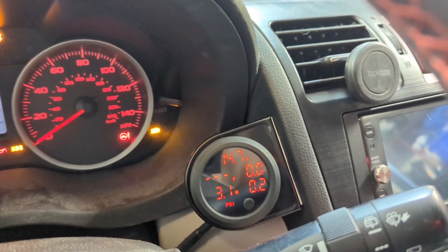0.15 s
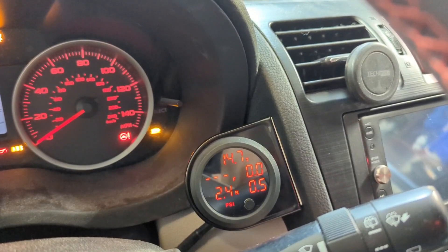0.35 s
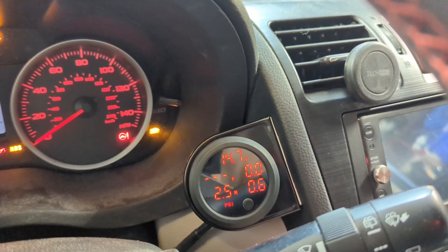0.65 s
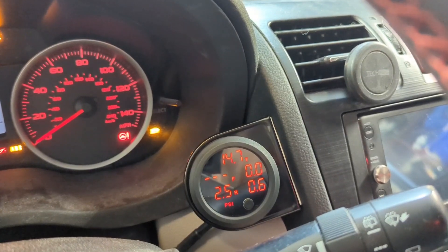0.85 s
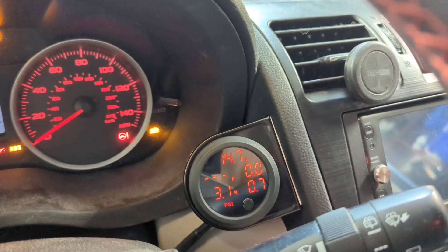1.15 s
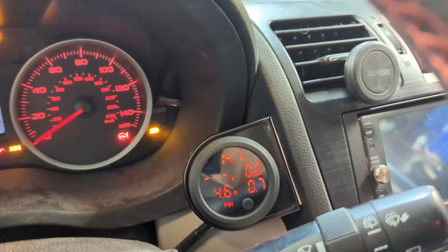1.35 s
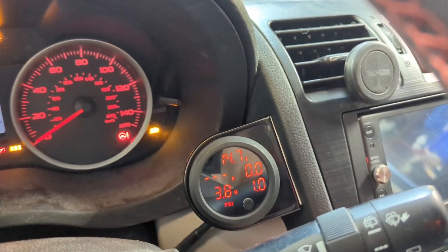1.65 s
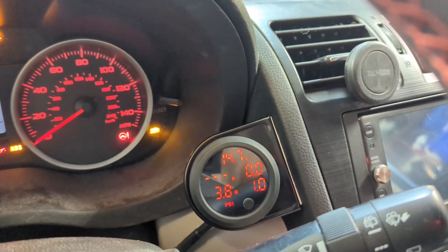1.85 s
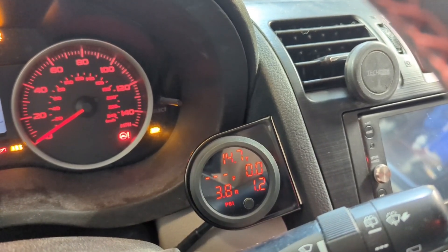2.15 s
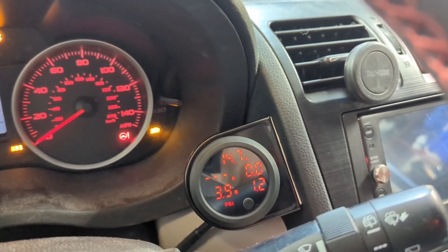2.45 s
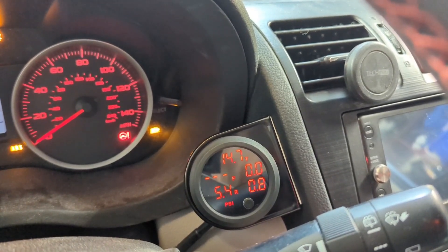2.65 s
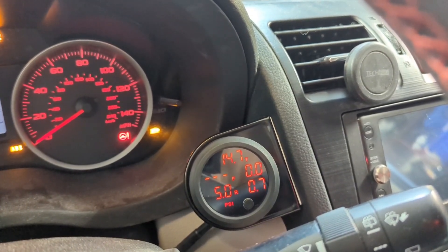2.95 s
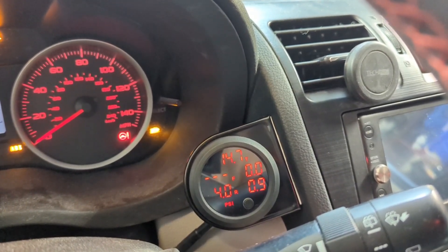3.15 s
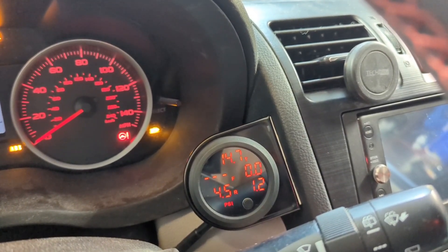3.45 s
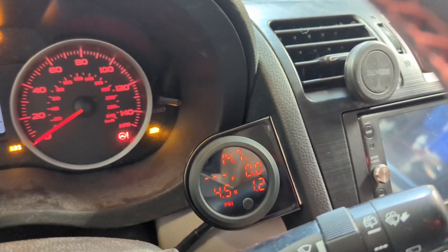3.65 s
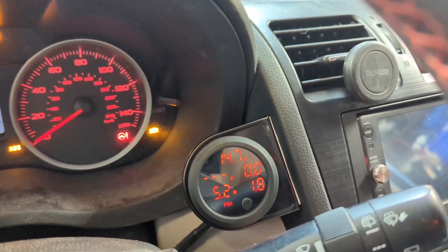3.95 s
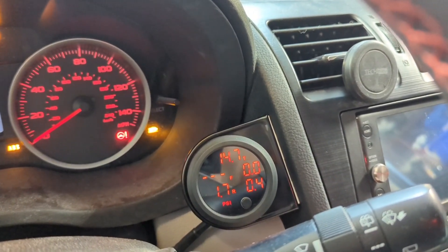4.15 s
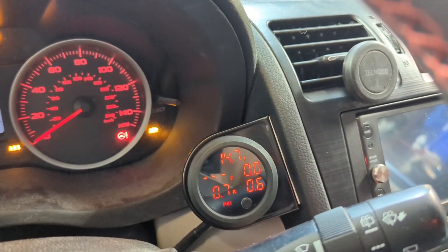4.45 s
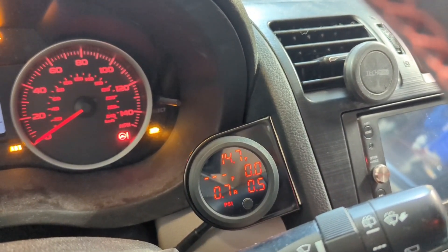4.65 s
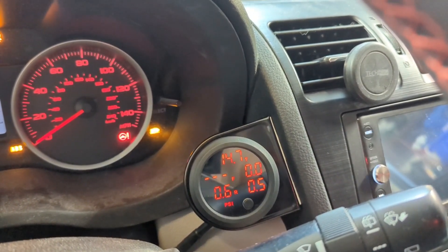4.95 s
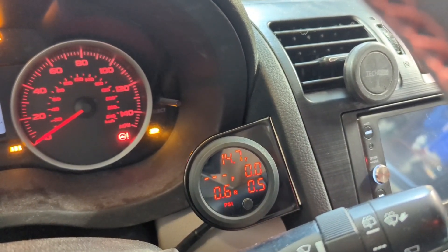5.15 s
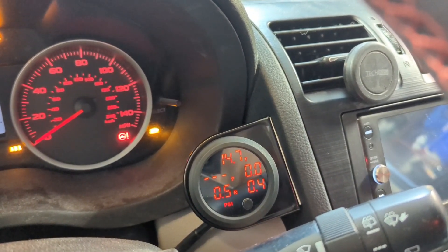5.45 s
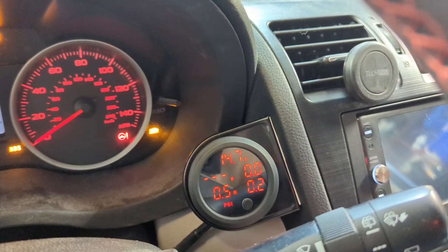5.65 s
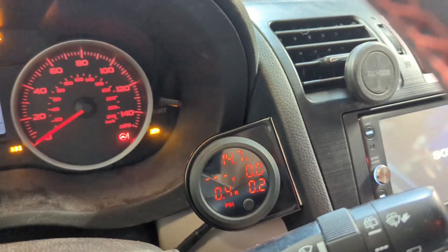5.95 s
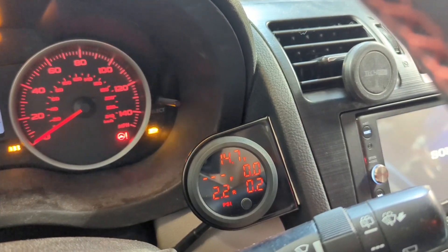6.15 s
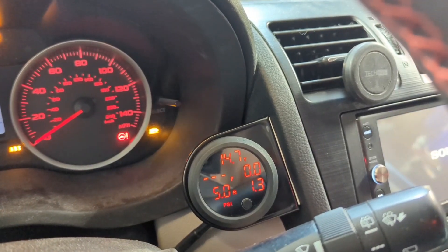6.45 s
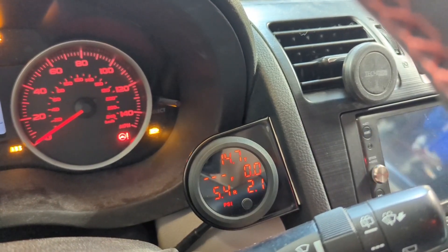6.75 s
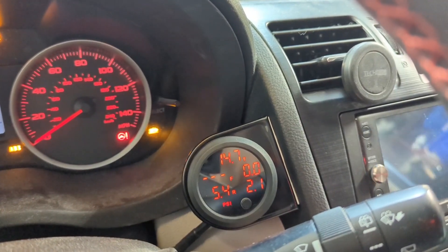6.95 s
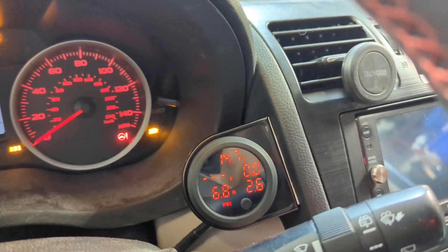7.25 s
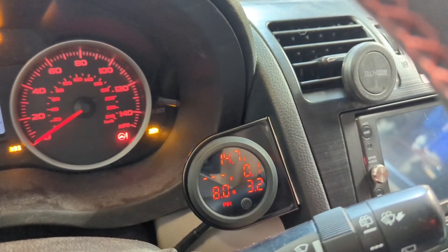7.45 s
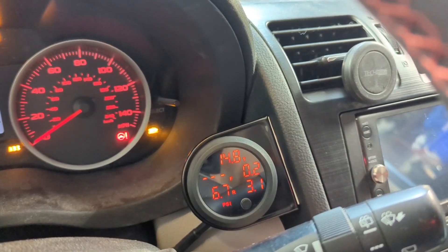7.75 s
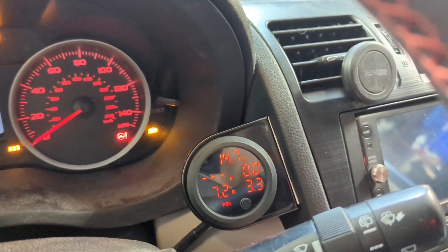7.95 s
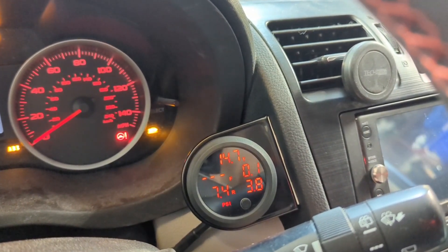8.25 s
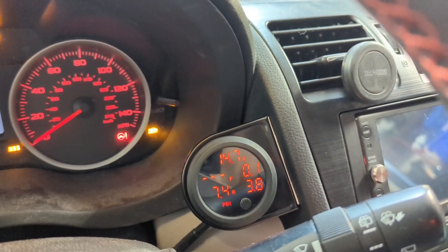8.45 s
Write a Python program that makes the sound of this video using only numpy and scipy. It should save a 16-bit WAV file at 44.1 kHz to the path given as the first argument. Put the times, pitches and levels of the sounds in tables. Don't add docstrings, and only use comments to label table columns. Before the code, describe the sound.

From the driver's seat, a starter motor turns an engine that will not fire, pulsing about six times a second with gear knock, hiss and thin whistle. The key is released with sharp clicks, a low thump and a whine sliding down. After near silence with faint hum, a solenoid clunks, the body shudders and cranking resumes to the end.

```python
import sys
import numpy as np
from scipy import signal
from scipy.fft import rfft, irfft
from scipy.io import wavfile
from scipy.ndimage import uniform_filter1d

SR = 44100
rng = np.random.default_rng(int(sys.argv[2]) if len(sys.argv) > 2 else 0)


def decibels_to_gain(level_db):
    exponent = np.asarray(level_db, float) / 20
    return 10 ** exponent


def unload_audio(sound):
    columns = np.transpose(np.atleast_2d(sound))
    steps = np.round(np.clip(columns, -1, 1) * 32767)
    wavfile.write(sys.argv[1], SR, steps.astype(np.int16))


N = 378819
TIME, HZ = np.arange(N) / SR, np.fft.rfftfreq(N, 1 / SR)

# (time [s], whine [Hz], whir level [dB])
COAST = [
    (3.68, 7900, -51),
    (3.76, 7500, -40),
    (3.9, 6800, -39),
    (4.1, 5050, -40.5),
    (4.35, 3300, -44),
    (4.5, 2350, -45),
    (4.65, 1400, -52.5),
    (4.75, 900, -60),
    (4.82, 600, -86),
]
# (frequency [Hz], density [dB per Hz])
WHIR = [(53, -28), (90, 3), (117, -25), (161, 1), (328, -19), (495, -8), (830, -8.5), (2050, -6),
        (3370, -17), (7020, -7), (8900, -6), (11000, -10.5), (12600, -6), (15600, -18)]


def evened(x):
    return x / np.sqrt(np.mean(x ** 2) + 1e-20)


def over_hz(points, column=1):
    table = np.transpose(points)
    return np.interp(np.log(HZ + 1), np.log(table[0] + 1), table[column])


def over_time(rows, column=1):
    table = np.transpose(rows)
    return np.interp(TIME, table[0], table[column])


def coloured(x, colour_db):
    return evened(irfft(rfft(x) * decibels_to_gain(colour_db), N))


def resonate(x, hz, width):
    turn = np.exp(2j * np.pi * np.cumsum(hz) / SR)
    r = np.exp(-np.pi * width / SR)
    smoothed = signal.lfilter([1], np.convolve([1, -r], [1, -r]), x / turn)
    return evened((turn * smoothed).real)


def swelling(s, db, rise, fall):
    distance = np.where(TIME < s, (s - TIME) / rise, (TIME - s) / fall)
    return decibels_to_gain(db - 20 * distance)


def add(mix, s, sound):
    at = round(s * SR)
    sound = sound[:, max(-at, 0):]
    part = mix[:, max(at, 0):][:, :sound.shape[1]]
    part += sound[:, :part.shape[1]]


def strokes():
    # (time [s], battery strength [dB])
    rounds = [(-0.012, 0), (0.67, -.6), (1.345, 0), (2.02, 0), (2.697, -.6), (3.375, .6), (4.052, 0),
              (5.76, -4), (6.499, -1.5), (7.199, .3), (7.881, 0), (8.569, -1.5), (9.25, 0)]
    firing = [0, .249, .503, .755]
    pause_start_s, pause_end_s = 3.6, 6.3
    s, db = np.transpose(rounds)
    times = s[:-1, None] + np.diff(s)[:, None] * firing
    rows = []
    for (k, cylinder), at in np.ndenumerate(times):
        cranking = at < pause_start_s or at > pause_end_s
        if cranking and at < N / SR:
            rows.append((at, db[k], cylinder))
    return rows


def drive_db():
    # (time [s], level [dB])
    let_go = [
        (3.66, 0),
        (3.72, 1.5),
        (3.76, -5.5),
        (3.8, -10.5),
        (3.9, -62),
    ]
    # (time [s], level [dB])
    bite = [
        (5.9, -64),
        (5.915, -32),
        (5.952, -18),
        (5.96, -10),
        (6.02, -2.5),
        (6.25, -2.5),
        (6.31, .6),
        (6.5, 0),
    ]
    return over_time(let_go + bite)


def gear_tones():
    # (thud [dB], boom [dB], mesh [dB], double mesh [dB], housing [dB])
    cylinders = [(-43, -39.5, -43.5, -39, -38), (-44.5, -38.8, -36.5, -41.5, -38),
                 (-40.8, -38.5, -40.5, -41.5, -39), (-39.8, -38.5, -39, -40.5, -40)]
    # (place [0-1], length [0-1], frequency [Hz], glide [share
    # per stroke], level [dB])
    thud = [(.24, .065, 76, .085, 5), (.45, .055, 72, -.022, 4.5), (.65, .055, 68, -.043, 4),
            (.18, .23, 52, 0, -5)]
    boom = [(.1, .085, 206, -.8, 5), (.34, .04, 200, 0, -12), (.81, .24, 180, 0, -7.5),
            (.13, .06, 140, -1.6, -3), (.36, .04, 135, -.019, -4.5)]
    mesh = [(.25, .075, 315, -.5, 4), (.55, .01, 295, .3, -12)]
    double_mesh = [(.05, .045, 660, -.23, 6.8), (.27, .08, 622, 0, 1.5), (.40, .06, 655, .1, -2.5),
                   (.45, .12, 905, -.1, -6), (.02, .05, 425, -.3, -2), (.1, .08, 490, 0, -5)]
    housing = [(.44, .06, 1550, -.1, 1.5), (.1, .1, 1810, -.23, -6), (.36, .11, 2110, 0, -10),
               (.2, .02, 1500, -.1, -3.5),
               (.24, .08, 1642, 0, 5.5), (.33, .1, 1310, -.03, 3.5)]
    stroke_s, lead_in, uneven_db = .17, .2, 1.3
    parts = (thud, boom, mesh, double_mesh, housing)
    tones = [(part, *tone) for part, table in enumerate(parts) for tone in table]
    place = np.arange(-lead_in, 1.2, 1 / (stroke_s * SR))
    out, rows = np.zeros((2, N)), strokes()
    chance = rng.standard_normal((len(rows), len(tones), 5))
    for (s, battery_db, cylinder), luck in zip(rows, chance):
        stroke = np.zeros((2, len(place)))
        for (part, centre, length, hz, glide, db), (detune, late, size, start, skew) in zip(tones, luck):
            u = place - centre - .01 * late
            pitch = 1 + .006 * detune
            turns = np.cumsum(hz * (pitch + glide * u)) / SR
            spread = length * np.where(u < 0, .75, 1.25)
            strength_db = cylinders[cylinder][part] + battery_db + db + uneven_db * size
            lag = np.array([[0], [.25 + .06 * skew]])
            swell = decibels_to_gain(strength_db - 3.5) * np.exp(-(u / spread) ** 2 / 2)
            stroke += np.sqrt(2) * swell * np.cos(2 * np.pi * (turns + start + lag))
        add(out, s - lead_in * stroke_s, stroke)
    return out


def gear_noise():
    # (place in the stroke [0-1], load [dB])
    stroke_load = [(0, -4.5), (.07, -2.5), (.25, 1.2), (.5, -.3), (.7, -4.5), (.93, -11.5), (1, -5.5)]
    # (frequency [Hz], density [dB per Hz])
    brushes = [(24, -32), (40, 5), (71, -3.5), (129, -9.5), (208, -6), (510, -16.5), (639, -4.5),
               (780, -12), (862, -6), (1650, -1), (2250, -2.5), (3000, -9), (5610, -14.3), (7380, -9),
               (11000, -19), (12500, -13.5), (15600, -20)]
    # (frequency [Hz], density [dB per Hz])
    tooth_knock = [(24, -33), (40, 5), (71, -4.5), (133, -9), (203, -4.5), (260, -33), (310, 3), (369, -17),
                   (639, -3), (780, -18), (884, -7.5), (1650, -2), (2250, -9), (3000, -4), (5610, -10.5),
                   (7380, -9), (15600, -27)]
    # (frequency [Hz], width [Hz], level [dB])
    resonances = [(221.4, 18, 6), (705, 50, -3.5), (644, 24, 4), (872, 15, 6), (750, 25, 2.5),
                  (1264, 46, 1.5), (1570, 50, 2.5), (1623, 11, 3.5), (1736, 15, -1.5), (1820, 32, 2.5),
                  (2017, 27, 2), (990, 90, -1.5), (2404, 41, 3.5), (3085, 25, 3), (3220, 9.2, 8.5),
                  (4100, 40, 4), (7520, 220, 2.5), (8860, 220, 4.5), (12100, 840, 2.5)]
    running_db, loaded_db, flicker_db = -31.2, -32.8, 0.75
    teeth_hz, teeth_depth = 309.1, 0.3

    starts = np.sort(np.r_[np.transpose(strokes())[0], 3.71, 5.95])
    place = np.interp(TIME, starts, np.arange(len(starts))) % 1
    load_db = np.interp(place, *np.transpose(stroke_load))
    cabin_db = sum(db / (1 + (2 * (HZ - hz) / width) ** 2) for hz, width, db in resonances)
    hiss, knock, jitter = rng.standard_normal((3, 2, N))
    flicker = decibels_to_gain(flicker_db * evened(uniform_filter1d(jitter[0], 500)))

    running = decibels_to_gain(running_db) * coloured(hiss * flicker, over_hz(brushes) + cabin_db)
    body = irfft(rfft(running) / (1 + (HZ / 1400) ** 4) / (1 + (250 / (HZ + 1)) ** 6), N)
    running = running + body * (decibels_to_gain(.6 * load_db + 2.5) - 1)

    wander = 3.0 * uniform_filter1d(jitter[1], 300)
    teeth = np.cumsum(teeth_hz * (1 + .15 * np.cos(2 * np.pi * place) + wander)) / SR
    chop = 1 - teeth_depth + teeth_depth * 4 * np.exp(-4 * (teeth % 1))
    knock = coloured(knock * chop * flicker, over_hz(tooth_knock) + cabin_db)
    chug = irfft(rfft(knock) / (1 + (HZ / 1300) ** 4), N)
    loaded = decibels_to_gain(loaded_db) * (decibels_to_gain(1.3 * load_db + 2.5) * chug + decibels_to_gain(load_db) * (knock - chug))
    return (running + loaded) * decibels_to_gain(drive_db())


def coil_whistle():
    whistle_hz, width_hz, whistle_db = 7168, 30, -54.5
    level_db = np.maximum(drive_db(), over_time(COAST, column=2) + 36)
    seeds = rng.standard_normal((2, N))
    whistle = np.array([resonate(n, np.full(N, whistle_hz), width_hz) for n in seeds])
    return decibels_to_gain(whistle_db + level_db) * whistle


def cabin_echo(pair):
    echo_db, t60_s = -11, 0.073
    t = np.arange(6000) / SR
    tail = rng.standard_normal((2, len(t))) * decibels_to_gain(-60 * t / t60_s) * (t > .002)
    tail = decibels_to_gain(echo_db) * tail / np.linalg.norm(tail, axis=1)[:, None]
    echo = signal.oaconvolve(pair, tail, axes=1)[:, :N]
    return pair + irfft(rfft(echo) / (1 + (1400 / (HZ + 1)) ** 4), N)


def garage():
    # (frequency [Hz], density [dB per Hz])
    room = [(18, -45.5), (30, -21), (43, -2), (169, -4), (231, -11), (351, -5), (380, -11.5), (433, -8),
            (577, -14.5), (641, -6.5), (730, -14.5), (855, -9.5), (1140, -16.5), (1520, -16), (15600, -56)]
    # (time [s], level [dB])
    after = [
        (4.6, -90),
        (4.72, -57),
        (5.0, -74),
        (5.3, -68),
        (5.36, -90),
    ]
    room_db = -50
    hum, hiss, swell = rng.standard_normal((3, 2, N))
    swell = decibels_to_gain(1.0 * evened(uniform_filter1d(swell[0], 3000)))
    hum = decibels_to_gain(room_db) * coloured(hum * swell, over_hz(room))
    return hum + decibels_to_gain(over_time(after)) * coloured(hiss, over_hz(WHIR))


def coasting():
    # (multiple of the whine [ratio], shift [Hz], level [dB], width [Hz])
    whines = [(1, 0, 2.5, 400), (1.75, 1100, 5.5, 1000), (3.4, -1500, 1, 1000)]
    whine_db = -13.5
    whir, *seeds = rng.standard_normal((1 + len(whines), 2, N))
    span = slice(round(3.6 * SR), round(4.9 * SR))
    whine = np.zeros((2, N))
    for (multiple, shift, db, width), pair in zip(whines, seeds):
        hz = multiple * over_time(COAST)[span] + shift
        heard = decibels_to_gain(db) * np.clip((13800 - hz) / 1200, 0, 1)
        whine[:, span] += [heard * resonate(n[span], np.minimum(hz, 16000), width) for n in pair]
    whine *= decibels_to_gain(3.0 * evened(uniform_filter1d(whir[0], 900)))
    ring_db = 6 / (1 + ((HZ - 8200) / 1300) ** 2)
    whine = irfft(rfft(whine) * decibels_to_gain(.9 * over_hz(WHIR) + ring_db + 7.5), N)
    level_db = over_time(COAST, column=2)
    return decibels_to_gain(level_db) * coloured(whir, over_hz(WHIR)) + decibels_to_gain(level_db + whine_db) * whine


def clicks():
    # (time [s], peak [dB], low part [dB], top part [dB], left-right [dB])
    events = [(3.6904, -21, -11, -12, 7), (3.9965, -14.5, -14, -8, 2.0), (4.1734, -27.5, -25, -16, 7),
              (4.1994, -28, -22, -11, 6.0), (4.2124, -29.5, -21, -16, 9), (4.2502, -26, -27, -19, 6.0),
              (4.6723, -33, -3, -16, 9), (4.6912, -33, -3, -2, 5.0), (4.697, -34, -12, -2, 2.0),
              (4.7014, -41, -10, -5, 0), (4.9028, -40, -12, -8.5, 2), (4.9851, -52, -8, -13, 3.0),
              (4.9944, -48.5, -11, -18.5, 1.0), (5.1094, -58, 2.5, -14.5, -9), (5.9145, -44, -6, -13, 3.5),
              (5.9307, -41, -12, -6, 7.0), (5.9532, -25, -6, -2, 5.0)]
    # (frequency [Hz], density [dB per Hz])
    metal_ring = [(1760, -62), (3000, -41), (4760, -24), (6860, -12.5), (8380, -2), (10200, -11.5),
                  (11000, -20), (12300, -23), (13000, -11), (15000, -6), (15600, -14)]
    t60_s, attack_s, split_hz = .04, .0006, 11500
    out, t = np.zeros((2, N)), np.arange(4000) / SR
    bright, top, dull = (n + 0.3 * n[::-1] for n in rng.standard_normal((3, 2, N)))
    bright = coloured(bright, over_hz(metal_ring) - 60 * (HZ > split_hz))
    top = coloured(top, over_hz(metal_ring) - 60 * (HZ < split_hz))
    dull = coloured(dull, -5 * np.log2((HZ + 1) / 2800) ** 2)
    for k, (s, db, low_db, top_db, pan_db) in enumerate(events):
        piece = slice(k * len(t), (k + 1) * len(t))
        shape = decibels_to_gain(db - 7 - 60 * t / t60_s) * (1 - np.exp(-t / attack_s))
        metal = bright[:, piece] + decibels_to_gain(low_db) * dull[:, piece] + decibels_to_gain(top_db + 5.5) * top[:, piece]
        add(out, s, shape * metal * decibels_to_gain([[pan_db / 2], [-pan_db / 2]]))
    return out


def dull_bursts():
    # (time [s], level [dB], centre [Hz], width [octaves], t60 [s])
    bursts = [(4.045, -30, 600, 1.2, 0.031), (5.915, -36, 920, 0.77, 0.1), (5.932, -34.5, 1100, 1.36, 0.11),
              (5.971, -24.5, 600, 1.2, 0.075), (5.99, -27.5, 1500, 1.6, 0.11), (6.36, -34, 540, 0.49, .12),
              (6.1, -40, 430, .6, .3), (3.695, -36, 630, .3, .12), (4.3, -41, 1700, .6, .05),
              (3.997, -38, 2500, 1.2, .03), (6.35, -35, 1150, .3, .2), (6.13, -35, 2000, .35, .35),
              (6.16, -38, 1030, .3, .4)]
    out, t = np.zeros((2, N)), np.arange(6000) / SR
    octave = np.log2(np.fft.rfftfreq(len(t), 1 / SR) + 1)
    seeds = rng.standard_normal((len(bursts), 2, len(t)))
    for (s, db, hz, width, t60), noise in zip(bursts, seeds):
        colour_db = -6 * ((octave - np.log2(hz)) / width) ** 2
        body = evened(irfft(rfft(noise) * decibels_to_gain(colour_db), len(t)))
        add(out, s, decibels_to_gain(db - 60 * t / t60) * body * (1 - np.exp(-t / 0.0015)))
    return out


def release_thump():
    # (time [s], level [dB], frequency [Hz], t60 [s])
    release = (3.756, -28, 68, .14)
    s, db, hz, t60 = release
    out, t = np.zeros((2, N)), np.arange(6000) / SR
    thump = -decibels_to_gain(db - 60 * t / t60) * np.sin(2 * np.pi * hz * t) * (1 - np.exp(-t / 0.0065))
    add(out, s, np.tile(thump, (2, 1)))
    return out


def engine_rocking():
    # (time [s], level [dB], frequency [Hz], rise [s], fall [s])
    rocks = [
        (6.022, -23, 77.7, .026, .045),
        (6.098, -33, 80, .04, .044),
        (6.195, -31, 80, .06, .03),
        (6.14, -35, 58, .06, .06),
        (6.05, -40, 179, .06, .08),
        (6.182, -27, 204, .11, .047),
        (6.235, -39, 202, .05, .13),
    ]
    # (time [s], level [dB], rise [s], fall [s])
    shudder = (6.055, -35, .1, .1)
    rough = coloured(rng.standard_normal((2, N)), -14 * np.log2((HZ + 1) / 150) ** 2)
    out = swelling(*shudder) * rough
    for s, db, hz, rise, fall in rocks:
        out += np.sqrt(2) * swelling(s, db, rise, fall) * np.cos(2 * np.pi * hz * (TIME - s))
    return out


def microphone_ports(pair):
    # (frequency [Hz], likeness [0-1], left leads by [radians], left-right [dB])
    port_pair = [(40, 0.95, 0, -1.5), (200, 0.97, 0.48, 1), (403, 0.72, 0.88, 1.5), (654, 0, 1.65, 3.5),
                 (900, 0.48, 2.5, 2), (1400, 0.36, 3, 5), (1640, 0.53, 4.5, 2), (1940, 0.45, 4.5, 4),
                 (4300, 0, 4.5, 2), (8000, 0.19, 5, 8), (13000, 0, 9.5, -0.5), (16000, .1, 22, 6)]
    a, b = rfft(pair)
    same = np.clip(over_hz(port_pair), 0, 1)
    lead, tilt = over_hz(port_pair, column=2), over_hz(port_pair, column=3)
    right = same * np.exp(-1j * lead) * a + np.sqrt(1 - same ** 2) * b
    return irfft(np.array([a * decibels_to_gain(tilt / 2), right * decibels_to_gain(-tilt / 2)]), N)


def scene():
    starter = gear_tones() + coil_whistle() + cabin_echo(gear_noise() + coasting())
    body = dull_bursts() + release_thump() + engine_rocking()
    return microphone_ports(starter + body + garage()) + clicks()


def low_pass(x):
    return signal.sosfilt(signal.butter(12, 16450, fs=SR, output="sos"), x)


def record(dry):
    bass_cut_hz, edge_hz = 43, 15830
    passed = (HZ < edge_hz) / (1 + (bass_cut_hz / (HZ + 1)) ** 6)
    return low_pass(irfft(rfft(dry) * passed, N))


dry = scene()
out = record(dry)
unload_audio(out)
```